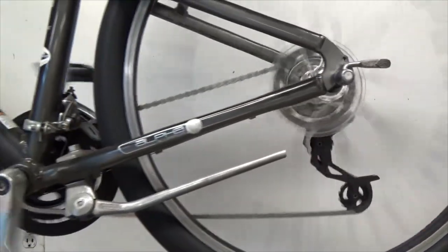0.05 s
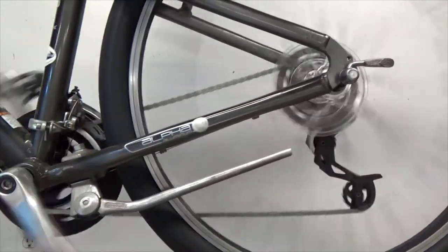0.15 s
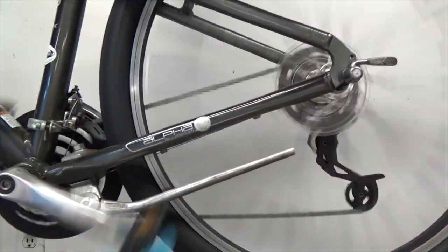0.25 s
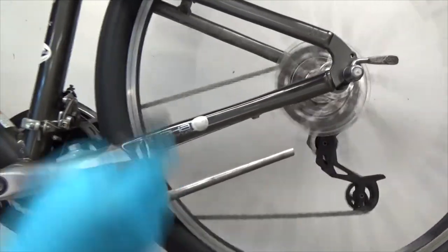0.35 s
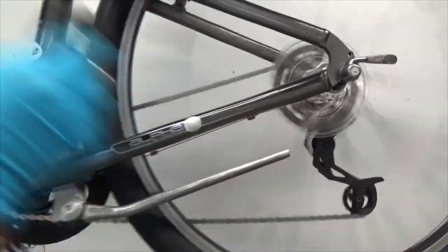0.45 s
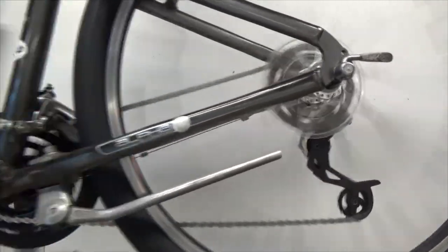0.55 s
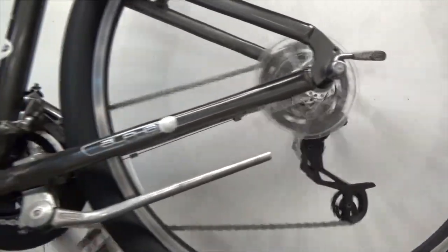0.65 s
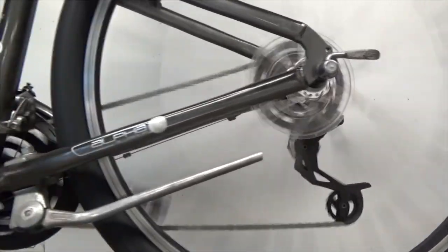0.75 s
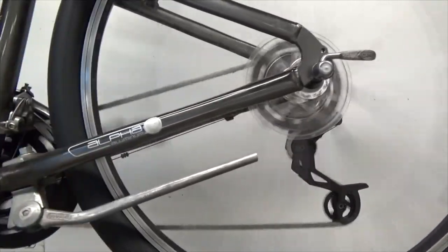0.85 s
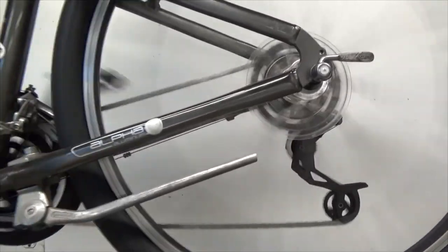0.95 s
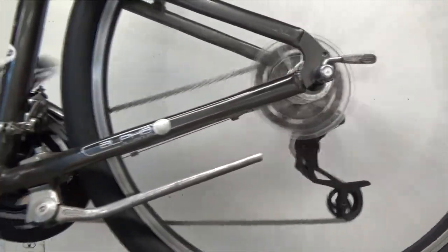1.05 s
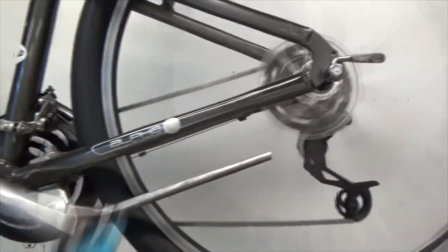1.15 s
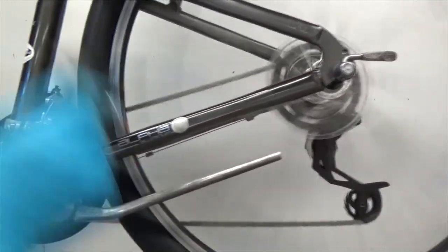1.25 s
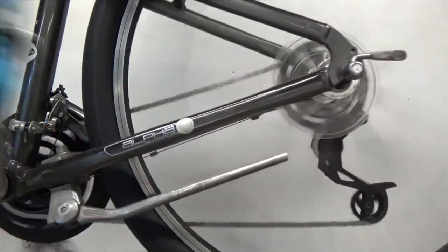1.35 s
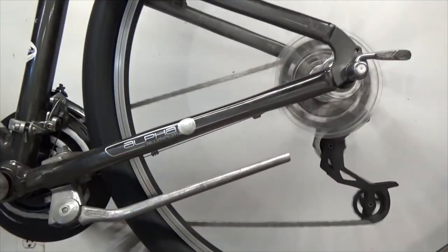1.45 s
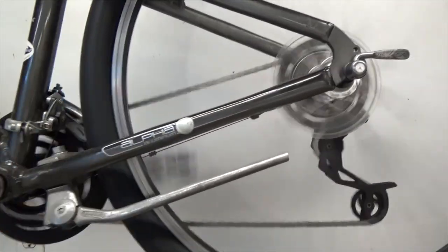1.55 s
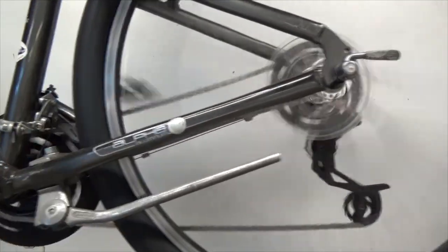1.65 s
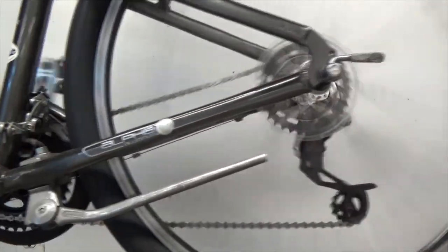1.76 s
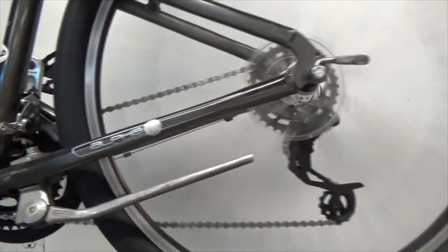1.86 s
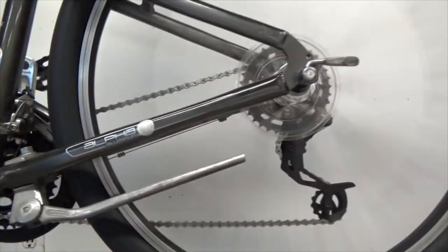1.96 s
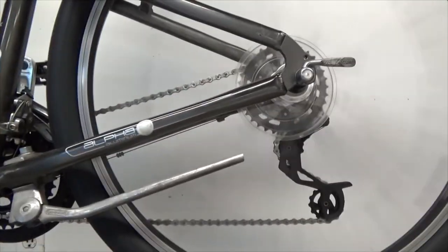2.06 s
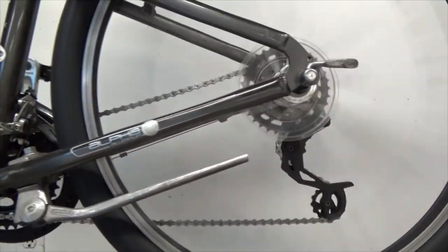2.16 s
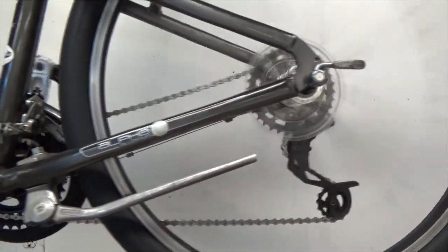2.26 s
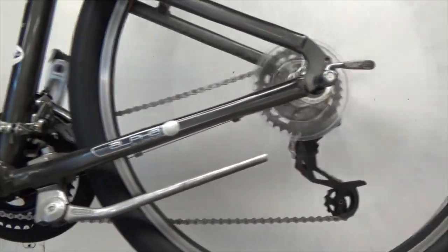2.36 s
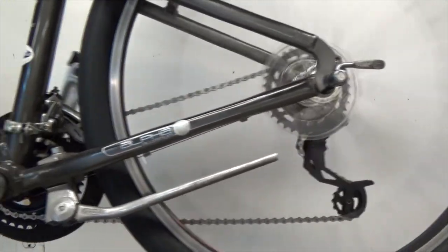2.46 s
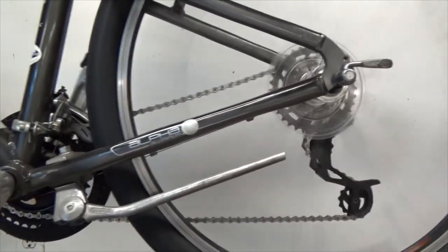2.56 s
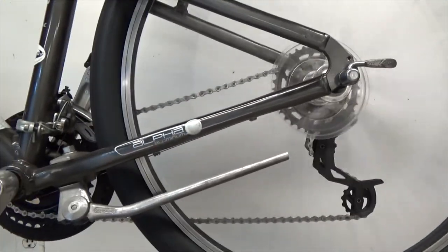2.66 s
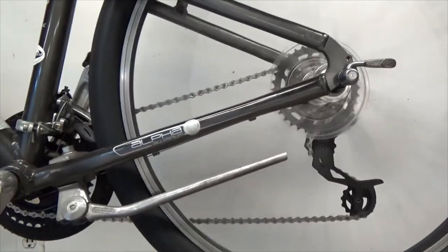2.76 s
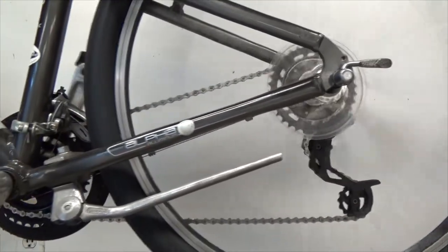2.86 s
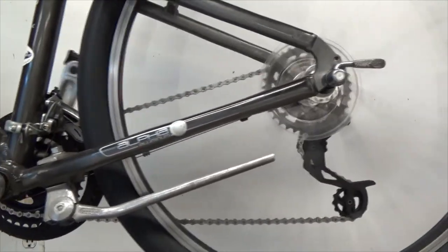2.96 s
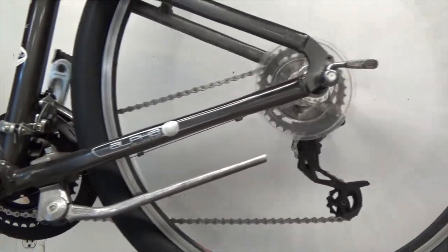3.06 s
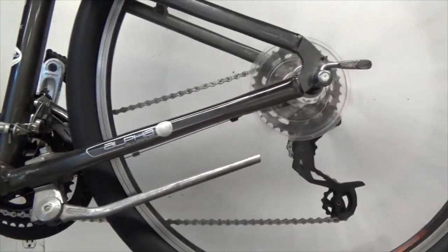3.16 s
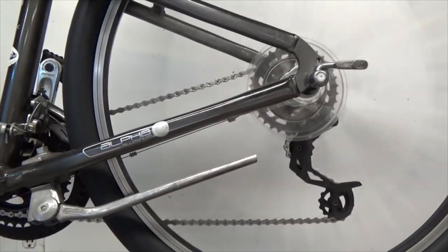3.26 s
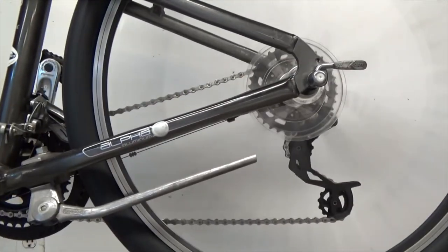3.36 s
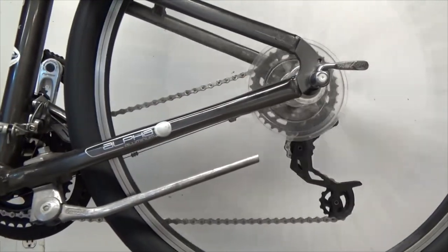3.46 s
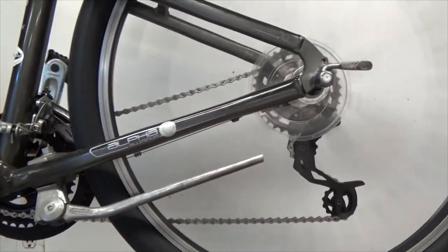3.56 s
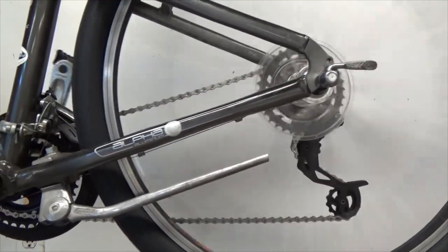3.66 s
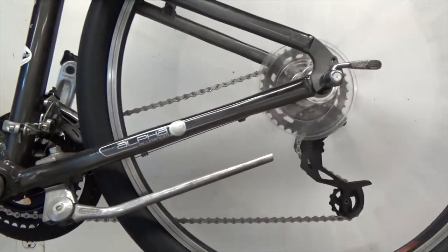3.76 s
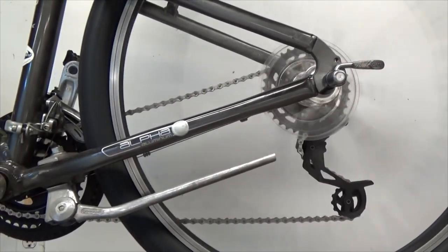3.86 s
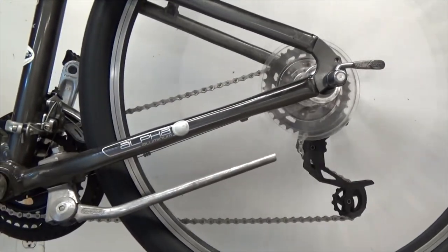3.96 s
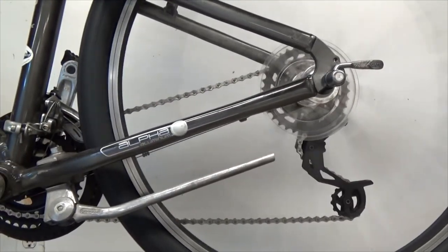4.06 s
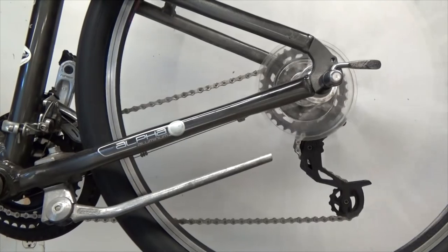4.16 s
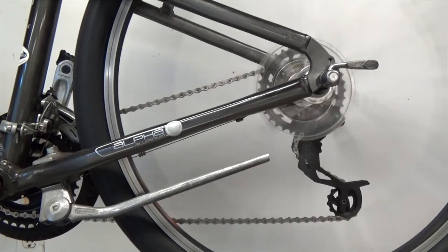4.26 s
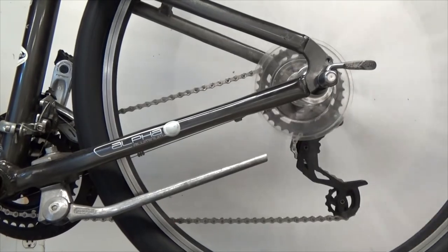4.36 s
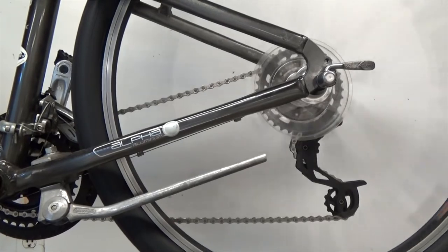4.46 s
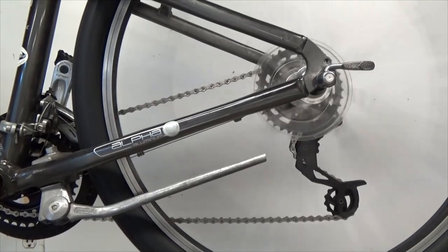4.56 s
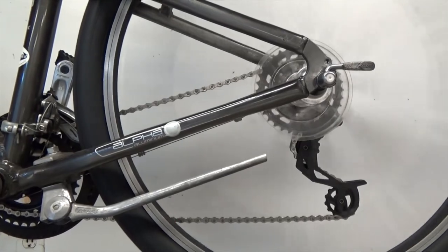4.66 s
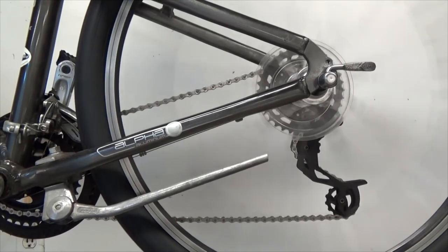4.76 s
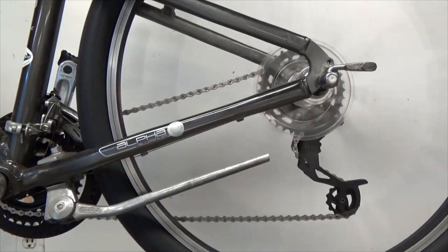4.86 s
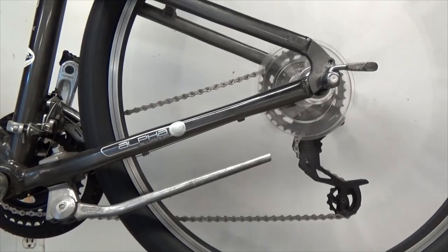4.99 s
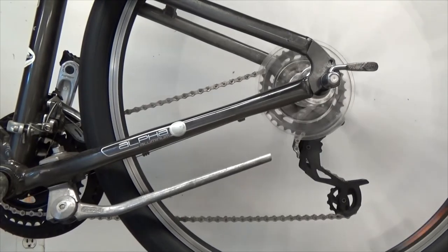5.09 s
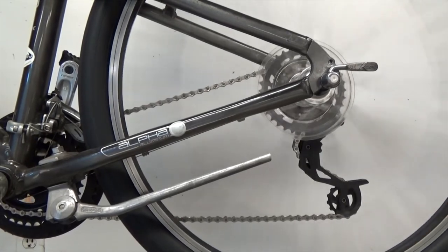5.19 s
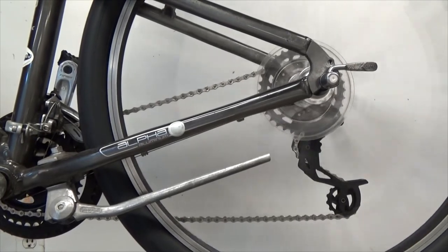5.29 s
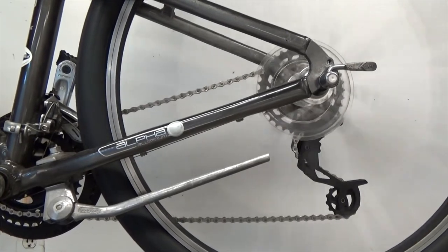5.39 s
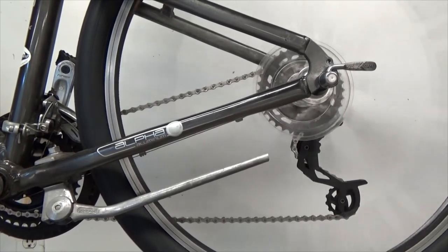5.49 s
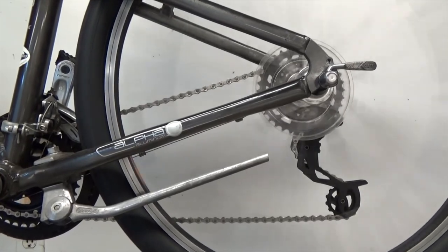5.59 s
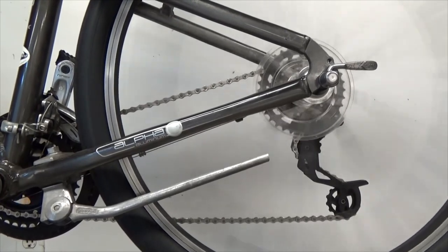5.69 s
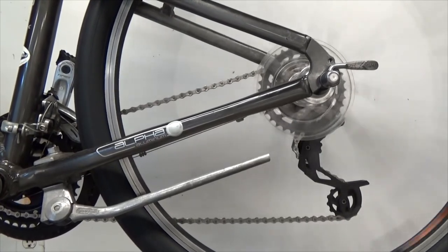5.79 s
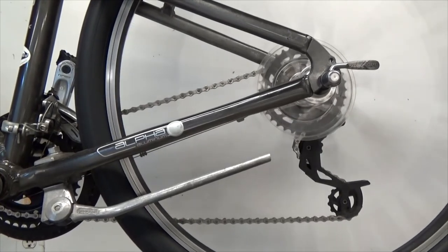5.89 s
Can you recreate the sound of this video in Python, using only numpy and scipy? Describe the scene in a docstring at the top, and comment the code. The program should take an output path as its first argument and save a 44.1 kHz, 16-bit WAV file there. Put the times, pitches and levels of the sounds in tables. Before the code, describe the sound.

Close up, a hand-cranked bicycle chain rattles briefly, then stops, leaving the freewheel ticking fast and slowly easing off.

```python
"""A bicycle on a stand by a wall is cranked by hand: the chain rustles and slaps, its links click onto
the sprocket, and the frame takes two soft clusters of knocks. After about 1.8 seconds the crank stops
and the rear wheel spins on. Its pawls (small spring catches) tick over the ratchet teeth about 30 times
a second and gradually slow. The ticks ring the hub in two swells a turn and the sprockets in one.
All the while, the bearings hiss and rumble through the frame."""
import sys
import numpy as np
from scipy import signal
from scipy.fft import rfft, irfft, next_fast_len
from scipy.io import wavfile
from scipy.ndimage import uniform_filter1d, map_coordinates

SR = 44100
rng = np.random.default_rng(int(sys.argv[2]) if len(sys.argv) > 2 else 0)


def generate_wav(signal):
    """Clip the signal to [-1, 1] and save it as 16-bit WAV at the path in sys.argv[1]."""
    frames = np.transpose(np.atleast_2d(signal))
    scaled = np.clip(frames, -1, 1) * 32767
    pcm = np.round(scaled).astype(np.int16)
    wavfile.write(sys.argv[1], SR, pcm)


N = 261513
SPAN = 8192  # samples in the longest single hit
AGE = np.arange(SPAN) / SR  # seconds since a hit began
TEETH = 20  # ratchet teeth in one turn of the wheel

# The room's echo. Each row: pitch in Hz, seconds to fade by 60 dB (called t60 below).
ROOM_FADE = [(200, 0.76), (2000, 0.81), (8000, 0.17), (15000, 0.018)]
# Echoes off near walls. Each row: delay in seconds, level in dB.
WALL_ECHOES = [(.0045, -15.5), (.0063, -18), (0.0097, -25), (.0124, -50), (0.0133, -13), (0.0153, -13)]
# The tone of each sound. Each row: pitch in Hz, relative level in dB.
AIR_TONE = [(20, -7), (60, -7), (110, -5), (145, 0), (175, -12.5), (400, 0.5), (2000, -4.5), (15000, -53)]
BEARING_TONE = [(150, -20.5), (400, -6), (950, -8), (1700, 0.5), (2050, 2), (2330, 3.5), (3300, -4),
                (4100, -2.5), (6300, -2.5), (7700, 2.5), (10000, -2.5), (12500, -12), (15500, -23)]
RUSTLE_TONE = [(500, -10.5), (1600, -6.5), (2400, -11.5), (3400, -0.5), (5000, 0), (6300, 3), (8200, -4),
               (9700, -1.5), (11000, -13.5), (12300, -14.5), (15500, -28)]
SIZZLE_TONE = [(6000, -45), (10500, 15), (13000, 13), (15500, 0)]
LINK_TONE = [(700, -65), (2300, -15.5), (4000, -15.5), (5300, -3.5), (6150, 3), (7250, 0.5), (8200, -5),
             (9200, 3.5), (9900, 2), (11000, -11.5), (12200, -23), (15500, -25)]
PAWL_TONE = [(1000, -25.5), (3500, -14), (5600, -3.5), (6400, -5), (7100, -6.5), (7650, 1.5), (8600, 1.5),
             (9500, -3.5), (10500, -3.5), (12000, -16.5), (13200, -15), (14600, -16), (15400, -14)]
STEREO_TONE = [(100, -61), (650, -34), (1000, -9.5), (2300, -12.5), (4100, -22.5), (6200, -18), (9000, -13),
               (11000, -15.5), (13000, -87), (15500, -70)]
# The notes (modes) at which each part rings. Each row: pitch in Hz, width in Hz, relative level in dB.
FRAME_MODES = [(217, 11.5, -4), (261.4, 4.2, 5.5), (341, 16.5, -5.5), (458, 6.1, -4), (569.5, 19, -1),
               (751, 31, -3), (1074, 27.5, -3.5), (1180, 45, -5.5), (1240, 8.9, -6)]
RIM_MODES = [(646.7, 26.7, 16), (693, 120, -13)]
TUBE_MODES = [(213, 35, -4), (255, 32, 2), (398, 130, -5.5), (614, 78, 0), (826, 120, -9), (1095, 55, -1)]  # two low, three middle, one high
SPROCKET_MODES = [(1565, 130, -7), (1920, 173, -2.5), (2035, 210, -7.5), (2221, 54, 5), (2336, 84, 8),
                  (2766, 490, -2), (3190, 110, -4)]
HUB_MODES = [(3600, 280, 8.5), (4130, 200, 18.5), (4690, 180, 8.5), (4990, 145, 11.5), (5250, 1000, 5.5),
             (5700, 220, -11)]
PAWL_MODES = [(7870, 83, -9), (8070, 120, 2), (9340, 320, -4), (10700, 65, -4), (11200, 150, -9.5),
              (13400, 60, -16), (15200, 230, -36)]
# How the air, the chain's rustle and sizzle, and the link clicks rise and fall.
# Each row: time in seconds, level in dB.
AIR_LEVELS = [(0, -68), (.6, -76), (1.5, -66), (5.9, -66)]
RUSTLE_LEVELS = [(0.0, -54), (.2, -47), (.33, -54), (0.44, -46.5), (0.696, -45), (1.024, -46.5),
                 (1.23, -40.5), (1.518, -40.5), (1.68, -38), (1.76, -48)]
SIZZLE_LEVELS = [(0, -73), (1.0, -58), (1.25, -65), (1.45, -48), (1.68, -50), (1.8, -64)]
LINK_LEVELS = [(0, -35.5), (.44, -37.5), (.52, -31.5), (.88, -33), (.972, -43), (1.0, -22.5), (1.058, -24),
               (1.12, -16), (1.168, -26.5), (1.22, -25.5), (1.25, -24), (1.35, -17), (1.404, -25),
               (1.46, -19), (1.553, -23), (1.58, -19), (1.695, -20.5), (1.73, -27.5)]
# The rolling bearings. Each row: time in seconds, boost of hiss and rim in dB, rumble level in dB.
BEARING_LEVELS = [(0, -9.5, -61.5), (.5, -8.5, -66.5), (.62, -4.5, -61), (.85, -5, -61.5),
                  (1.5, -1.5, -57.5), (1.76, -3, -56), (1.95, .5, -54), (2.5, 1.3, -54.5),
                  (2.85, -1.5, -58), (3.5, 0, -58.5), (3.75, 0, -53), (4.3, -1, -56), (5.3, -1.9, -59.5),
                  (5.9, -1.5, -59)]
# The crank stops. Each row: time in seconds, chain motion (1 is running, near 0 is at rest).
CHAIN_MOTION = [(1.72, 1), (1.84, 0.026)]
# Knocks on the frame. Each row: start in seconds, level in dB, t60 in seconds,
# boost of the low modes in dB, boost of the high mode in dB.
FRAME_KNOCKS = [(.566, -43, 0.22, -9, -1), (.603, -44, 0.34, -6, -16), (.715, -52, .25, -8, -22),
                (1.484, -36.5, 0.22, 5.5, 4.5), (1.518, -41.5, .11, 3, 2)]
# The chain slaps. Each row: start in seconds, level in dB, pitch in Hz, t60 in seconds.
CHAIN_SLAPS = [(0.0659, -41.5, 2110, 0.065), (.137, -47, 4600, .03), (.155, -40, 4830, 0.047),
               (0.444, -45.5, 3000, 0.068), (.583, -44.5, 2690, 0.052), (0.72, -44, 2900, 0.037),
               (1.037, -38, 2260, 0.16), (1.05, -45, 2700, 0.045), (1.595, -43, 2980, 0.063),
               (1.638, -37, 2330, 0.085)]
# Slack links click out of step. Each row: start in seconds, level in dB.
SLACK_CLICKS = [(0.0658, -34), (0.155, -32.5), (.961, -36), (0.9856, -34), (1.3903, -27), (1.5223, -19),
                (1.593, -23), (1.6376, -33)]
# The chain gathers speed. Each row: time in seconds, links run onto the sprocket so far.
LINKS_PASSED = [(.015, 0), (.2983, 7), (.4468, 11), (.821, 22), (1.031, 29), (1.195, 35), (1.5065, 47),
                (1.58, 50), (1.6995, 55), (1.7285, 56)]
# The coasting wheel slows. Each row: time in seconds, ratchet teeth passed so far.
TEETH_PASSED = [(1.7728, 0), (1.8118, 1), (1.8437, 2), (2.211, 15), (2.343, 20), (2.4955, 26), (2.605, 30),
                (2.8706, 39), (3.2215, 50), (3.5833, 62), (3.8205, 70), (4.168, 81), (4.66, 96),
                (4.9585, 105), (5.4045, 118), (5.6835, 126), (5.9, 132)]


def amp(db):
    """Turn decibels into a factor to multiply by."""
    return 10 ** (np.asarray(db) / 20)


def unit(x):
    """Scale a signal to an average power of 1."""
    return x / np.sqrt(np.mean(x ** 2) + 1e-20)


def along(points, hz):
    """Read between rows of (Hz, value) on a logarithmic pitch scale."""
    pitches, values = np.transpose(points)
    return np.interp(np.log(hz + 1), np.log(pitches + 1), values)


def curves(rows):
    """Give one value per sample for each column after the time."""
    times, *columns = np.transpose(rows)
    return [np.interp(np.arange(N) / SR, times, column) for column in columns]


def colour(points):
    """Make a filter from a tone table."""
    def response(hz):
        cepstrum = irfft(np.log(amp(along(points, hz))))
        half = len(cepstrum) // 2
        # fold it so that nothing sounds before the hit
        cepstrum[1:half] *= 2
        cepstrum[half + 1:] = 0
        return np.exp(rfft(cepstrum))
    return response


def body(modes):
    """Make a filter that rings at the given modes."""
    return lambda f: sum((-1) ** k * amp(db) * 1j * f * width / (hz * hz - f * f + 1j * f * width)
                         for k, (hz, width, db) in enumerate(modes))


def filtered(x, response):
    """Pass a signal through a filter."""
    n = x.shape[-1]
    size = 2 * next_fast_len(n // 2 + SPAN // 4)
    return irfft(rfft(x, size) * response(np.fft.rfftfreq(size, 1 / SR)), size)[..., :n]


def contacts(count, t60, bounce_s, bounce_db, scatter_s, chatter_db, chatter_t60):
    """Make one burst of force per hit: a strike, a bounce and dying chatter."""
    t = AGE[:SPAN // 4]
    chance = rng.standard_normal((count, 2))
    since_bounce = t - bounce_s - scatter_s * chance[:, :1]
    bounce = amp(bounce_db + 1.7 * chance[:, 1:] - 60 * np.abs(since_bounce) / t60) * (since_bounce > 0)
    power = amp(-60 * t / t60) ** 2 + bounce ** 2 + amp(chatter_db - 60 * t / chatter_t60) ** 2
    return np.sqrt(power) * rng.standard_normal(power.shape)


def place(starts, levels_db, sounds, hold_s):
    """Lay out sounds in time, each with the energy of its level held for hold_s seconds."""
    out = np.zeros(N + SR)
    for start, db, sound in zip(starts, levels_db, sounds):
        scaled = amp(db) * np.sqrt(hold_s * SR) * sound / np.linalg.norm(sound)
        out[max(round(start * SR), 0):][:len(sound)] += scaled
    return out[:N]


def passing(rows):
    """Find the moment at which each tooth or link passes."""
    times, passed = np.transpose(rows)
    return np.interp(np.arange(round(passed[-1]) + 1), passed, times)


def facing(tooth, peak_tooth):
    """Follow the wheel round: 1 at the peak tooth, -1 half a turn later."""
    return np.cos(2 * np.pi * (tooth - peak_tooth) / TEETH)


def room(x, tail_db, wall_db):
    """Add echoes off near walls and a fading tail that differs between left and right."""
    hz, t, spectrum = signal.stft(rng.standard_normal((2, SR // 3)), SR, nperseg=256)
    fade = amp(-60 * t / along(ROOM_FADE, hz)[:, None])
    tail = signal.istft(spectrum * fade, SR, nperseg=256)[1]
    wash = signal.fftconvolve(x[None], tail / np.linalg.norm(tail[0]), axes=1)[:, :N]
    echoes = filtered(x, lambda f: sum(amp(db) * np.exp(-2j * np.pi * f * s) for s, db in WALL_ECHOES))
    return x + amp(wall_db) * echoes + amp(tail_db) * wash


def stereo_spread(x, delay_s, scatter_db):
    """Sound bounces off the frame and spokes and reaches left and right differently."""
    t = AGE[:SPAN // 4]
    scatter = rng.standard_normal(len(t)) * amp(-60 * t / 0.1)
    spokes = signal.fftconvolve(x, scatter / np.linalg.norm(scatter))[:N]
    frame = filtered(x, lambda f: np.exp(-2j * np.pi * f * delay_s))
    side = filtered(amp(-1.5) * frame + amp(scatter_db) * spokes, colour(STEREO_TONE))
    return np.array([side, -side])


def air():
    """The wheel stirs a faint draught."""
    level_db, = curves(AIR_LEVELS)
    noise = rng.standard_normal(N) + 0.73 * rng.standard_normal((2, N))
    return amp(level_db) * unit(filtered(noise, colour(AIR_TONE)))


def bearings():
    """Rolling balls hiss softly and set the frame rumbling and the rim ringing."""
    boost_db, rumble_db = curves(BEARING_LEVELS)
    # the rim's level wavers through 7 random values a second
    waver_db = 2 * map_coordinates(rng.standard_normal(SPAN), [np.arange(N) / SR * 7])
    rumble = unit(filtered(rng.standard_normal(N), body(FRAME_MODES)))
    rim = unit(filtered(rng.standard_normal(N), body(RIM_MODES)))
    hiss = unit(filtered(rng.standard_normal(N), colour(BEARING_TONE)))
    running, = curves(CHAIN_MOTION)
    rim_db = -54 + boost_db - 5.5 * running + waver_db  # the taut chain damps the rim
    return amp(rumble_db) * rumble + amp(rim_db) * rim + amp(-43 + boost_db) * hiss


def frame_knocks():
    """Dull blows shake the frame tubes; where they land sets the share of low and high modes."""
    starts, db, t60, low_db, high_db = np.transpose(FRAME_KNOCKS)
    swell = 1 - np.exp(-AGE / 0.0027)
    push = rng.standard_normal((len(starts), SPAN)) * amp(-60 * AGE / t60[:, None]) * swell
    tubes = lambda f: (amp(low_db[:, None]) * body(TUBE_MODES[:2])(f)
                       + body(TUBE_MODES[2:5])(f)
                       + amp(high_db[:, None]) * body(TUBE_MODES[5:])(f))
    return place(starts, db, filtered(push, tubes), hold_s=0.0077)


def chain_rustle():
    """The chain's rollers rustle until the crank stops, and sizzle most under hard cranking."""
    rustle_db, = curves(RUSTLE_LEVELS)
    sizzle_db, = curves(SIZZLE_LEVELS)
    running, = curves(CHAIN_MOTION)
    flutter_db = 2.2 * map_coordinates(rng.standard_normal(N // 100), [np.arange(N) / SR * 90])
    taps = (rng.random(N) < 4500 / SR) * rng.standard_normal(N)  # about 4500 a second
    rustle = unit(filtered(unit(taps) + 0.087 * rng.standard_normal(N), colour(RUSTLE_TONE)))
    sizzle = unit(filtered(taps, colour(SIZZLE_TONE)))
    return amp(flutter_db) * running * (amp(rustle_db - 1.5) * rustle + amp(sizzle_db) * sizzle)


def chain_slaps():
    """The chain slaps the gear changer's cage: a short metal ring with a little rattle."""
    starts, db, ring_hz, t60 = np.transpose(CHAIN_SLAPS)
    rattles = rng.standard_normal((len(starts), SPAN // 2)) * amp(-60 * AGE[:SPAN // 2] / t60[:, None])
    rings = [filtered(rattle, body([(hz, 800, 0), (1500, 900, -10), (6300, 2500, -12)]))
             for rattle, hz in zip(rattles, ring_hz)]
    return place(starts, db, rings, hold_s=0.0077)


def link_clicks():
    """A link's side plate touches the sprocket first, and its roller drops in a moment later."""
    in_step = passing(LINKS_PASSED)
    in_step_db = np.interp(in_step, *np.transpose(LINK_LEVELS))
    starts, db = np.vstack([np.column_stack([in_step, in_step_db]), SLACK_CLICKS]).T
    hits = contacts(len(starts), t60=0.0028, bounce_s=0.0005, bounce_db=8,
                    scatter_s=0.0001, chatter_db=-18, chatter_t60=0.035)
    # the echo off the wall takes a slightly different path for each link
    delay_s = 0.0026 + 0.00015 * rng.standard_normal((len(starts), 1))
    wall = lambda f: 1 + amp(-6) * np.exp(-2j * np.pi * f * delay_s)
    clicks = filtered(hits, lambda f: colour(LINK_TONE)(f) * wall(f))
    return place(starts - 0.0002, db, clicks, hold_s=0.0013)


def tone_drift(snaps, depth_db, blur_hz):
    """The tone of the ticks drifts as the wheel turns, and repeats every turn."""
    spectra = rfft(snaps)
    drift = uniform_filter1d(rng.standard_normal((TEETH, spectra.shape[1])), size=4, axis=0, mode="wrap")
    drift = uniform_filter1d(drift, max(1, round(blur_hz * snaps.shape[1] / SR)), axis=1)
    return irfft(spectra * amp(depth_db * unit(drift))[np.arange(len(snaps)) % TEETH])


def sprocket_ring(starts, tooth, scatter_db):
    """Each tick shakes the sprockets, which grow quieter once a turn."""
    shakes = contacts(len(starts), t60=0.0066, bounce_s=0.0046, bounce_db=-1,
                      scatter_s=0.00076, chatter_db=-8.5, chatter_t60=0.031)
    teeth_from_dip = (tooth - 14.4 + TEETH / 2) % TEETH - TEETH / 2
    db = -40 - 7 * np.exp(-(teeth_from_dip / 2.8) ** 2) + scatter_db
    return place(starts, db, filtered(shakes, body(SPROCKET_MODES)), hold_s=0.0064)


def hub_ring(starts, tooth, scatter_db):
    """The point each tick strikes circles the hub, crossing a spot that rings weakly twice a turn."""
    blows = contacts(len(starts), t60=0.012, bounce_s=0.0055, bounce_db=-8,
                     scatter_s=0.00011, chatter_db=-3.5, chatter_t60=0.03)
    position = facing(tooth, 6.02)
    swell_db = 20 * np.log10(np.hypot(position, amp(-6.5)))
    lean_db = 1.5 * facing(tooth, 7.3)  # the hub runs off centre, so one side is struck harder
    lower = filtered(blows, body(HUB_MODES[:2]))
    upper = amp(4.4 * position[:, None] + 1) * filtered(blows, body(HUB_MODES[2:]))  # swells once a turn
    return place(starts, -33 + swell_db + lean_db + scatter_db, lower + upper, hold_s=0.0045)


def pawl_snaps(starts, tooth, scatter_db):
    """A pawl snaps down behind each tooth, bounces once and rings."""
    snaps = contacts(len(starts), t60=0.012, bounce_s=0.0024, bounce_db=5,
                     scatter_s=0.00035, chatter_db=3, chatter_t60=0.071)
    snaps = tone_drift(snaps, depth_db=1.73, blur_hz=404)
    # the first ticks are softer while the crank comes to rest
    db = -33 - 3.5 * np.exp((starts[0] - starts) / 0.022) + scatter_db
    # the snap's treble and the pawl's own ring each swell once a turn
    treble_db = -2 * facing(tooth[:, None], 2.7)
    ring_db = -10.5 + 6.5 * facing(tooth, 2.6)
    treble = lambda f: amp(treble_db * np.exp(-((f - 10300) / 570) ** 2))
    clicks = filtered(snaps, lambda f: colour(PAWL_TONE)(f) * treble(f))
    rings = filtered(snaps, body(PAWL_MODES))
    return place(starts, db, clicks, hold_s=0.009) + place(starts, db + ring_db, rings, hold_s=0.0058)


def freewheel():
    """The coasting wheel ticks once per tooth, each tick a little louder or softer by chance."""
    starts = passing(TEETH_PASSED)
    tooth = np.arange(len(starts))
    chance = rng.standard_normal((len(starts), 3)).T
    return (pawl_snaps(starts, tooth, scatter_db=1.06 * chance[0])
            + hub_ring(starts, tooth, scatter_db=1.42 * chance[1])
            + sprocket_ring(starts, tooth, scatter_db=1.42 * chance[2]))


def scene():
    """The bicycle, heard close up in a quiet room."""
    bike = freewheel() + link_clicks() + chain_rustle() + chain_slaps() + frame_knocks() + bearings()
    bike = filtered(bike, lambda f: (1j * f / (1j * f + 110)) ** 2)  # thin tubes give off little bass
    background = air() + room(bike, tail_db=-20, wall_db=-5) - bike
    return background + bike + stereo_spread(bike, delay_s=0.0016, scatter_db=-6.5)


def record(dry):
    """Cut off the very highest treble."""
    return filtered(dry, lambda hz: hz < 15850)


dry = scene()
out = record(dry)
generate_wav(out)
```